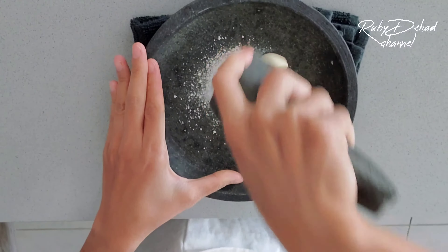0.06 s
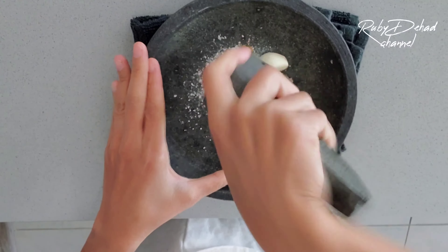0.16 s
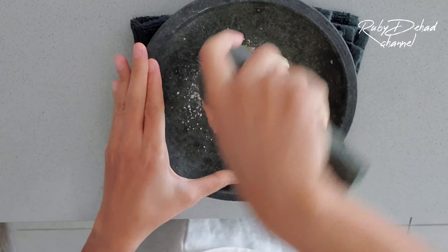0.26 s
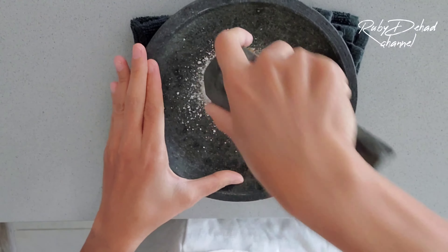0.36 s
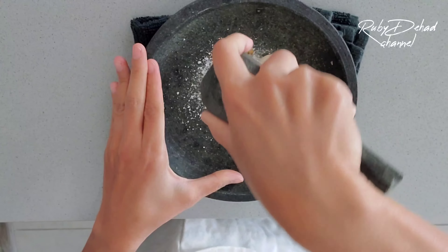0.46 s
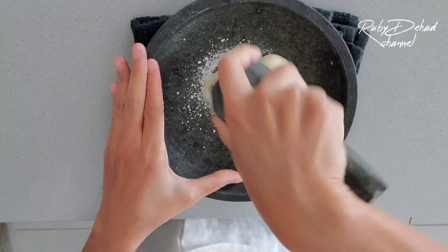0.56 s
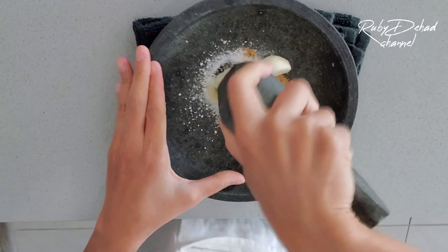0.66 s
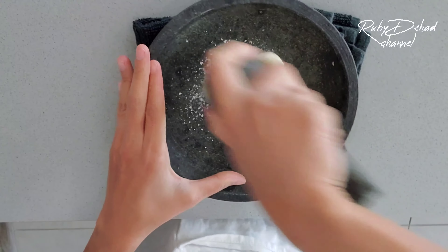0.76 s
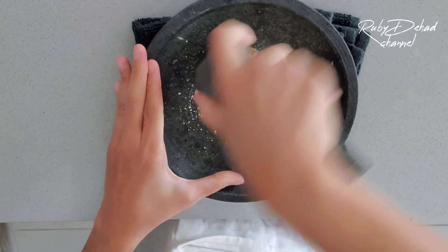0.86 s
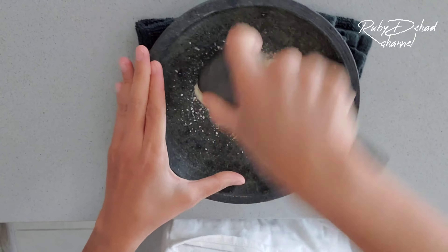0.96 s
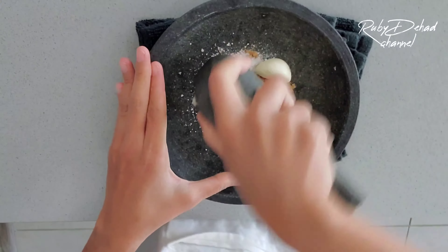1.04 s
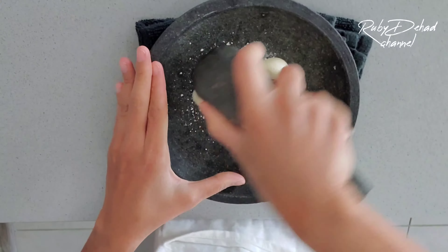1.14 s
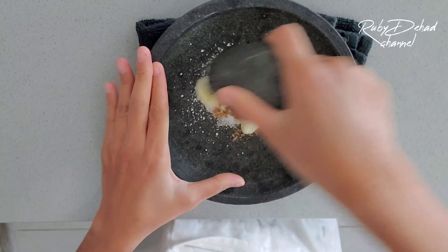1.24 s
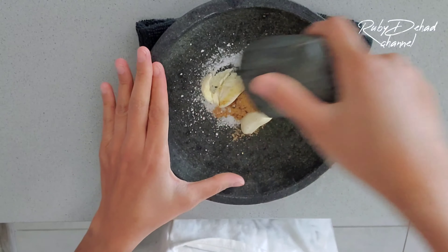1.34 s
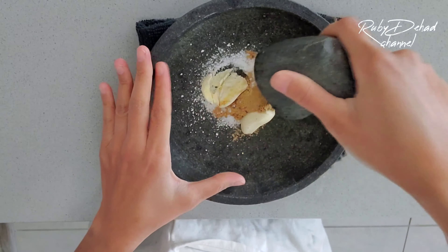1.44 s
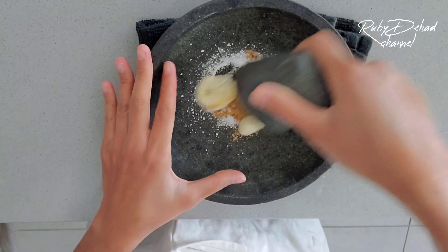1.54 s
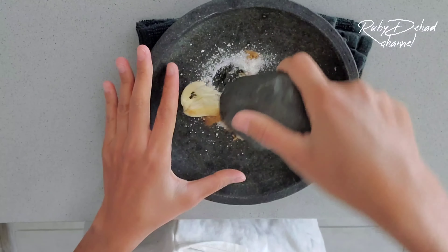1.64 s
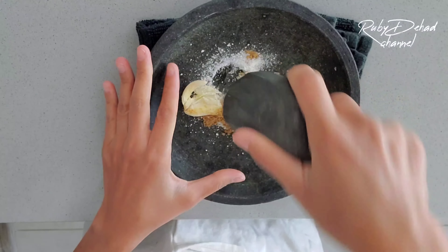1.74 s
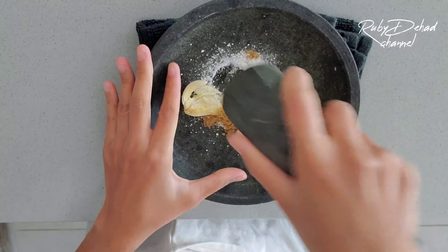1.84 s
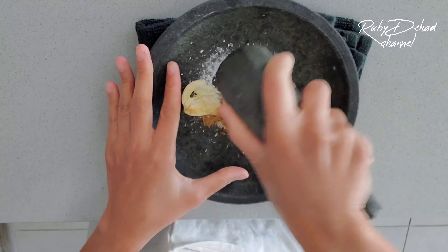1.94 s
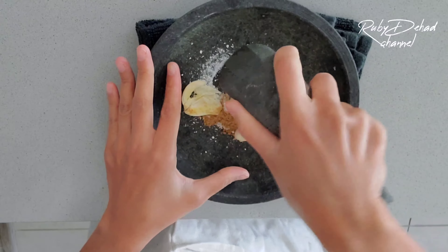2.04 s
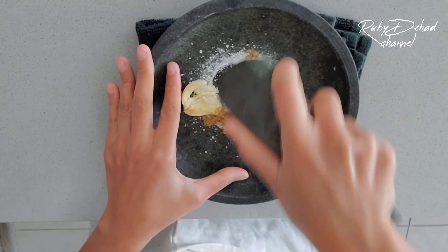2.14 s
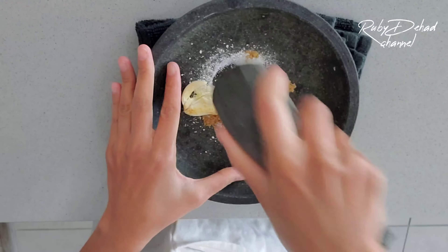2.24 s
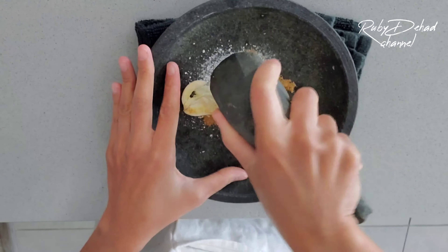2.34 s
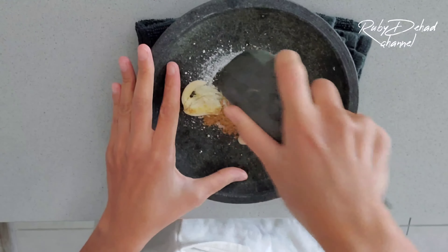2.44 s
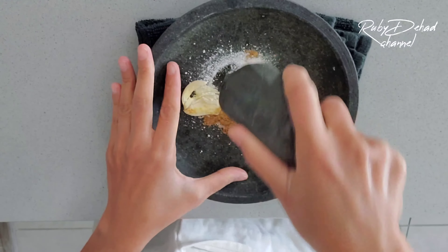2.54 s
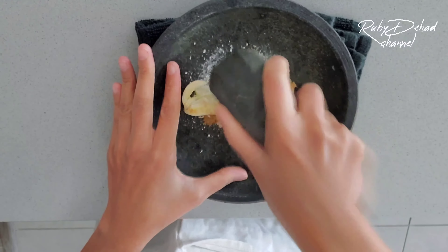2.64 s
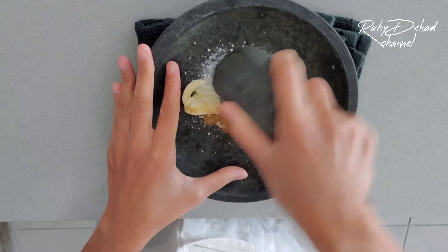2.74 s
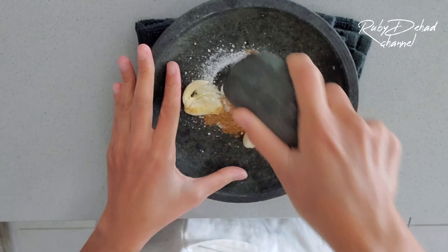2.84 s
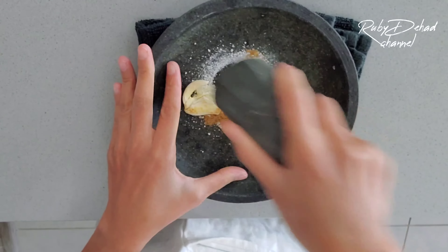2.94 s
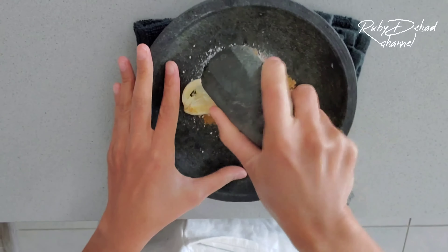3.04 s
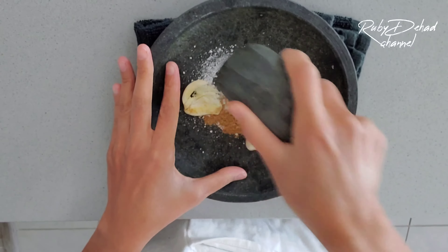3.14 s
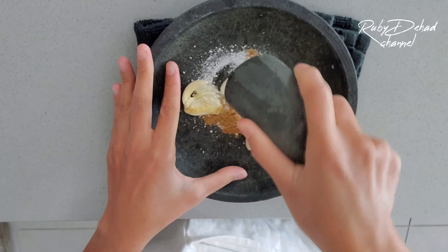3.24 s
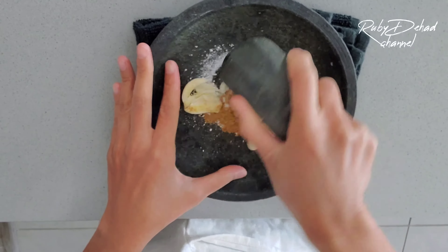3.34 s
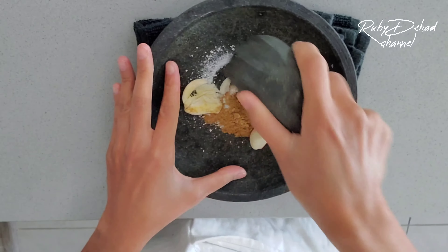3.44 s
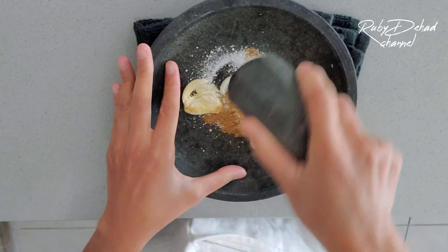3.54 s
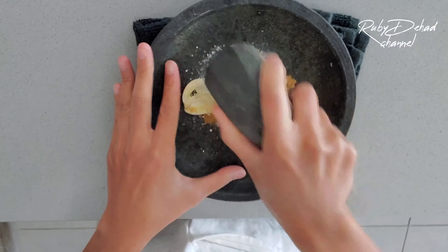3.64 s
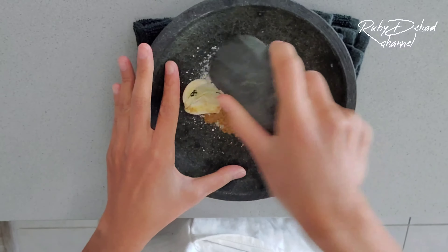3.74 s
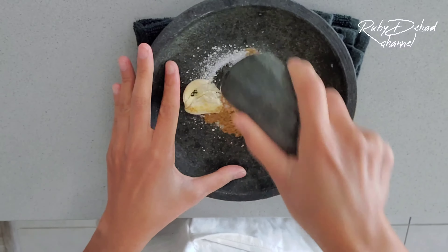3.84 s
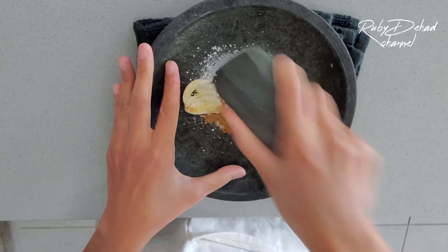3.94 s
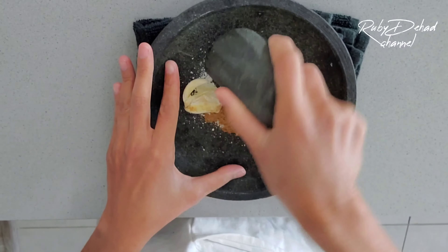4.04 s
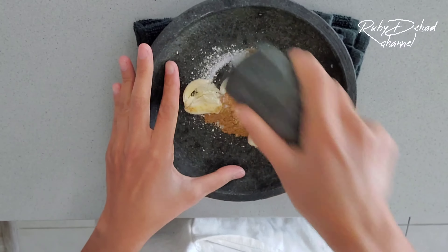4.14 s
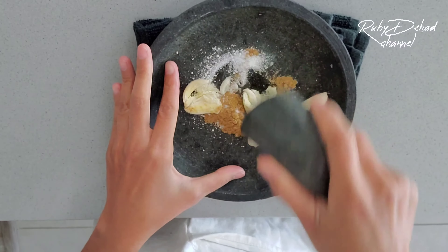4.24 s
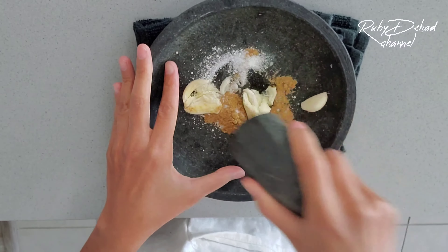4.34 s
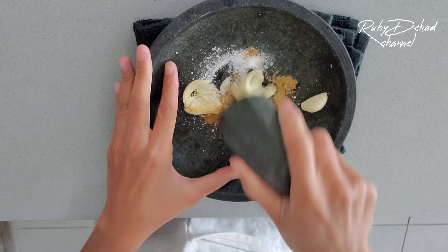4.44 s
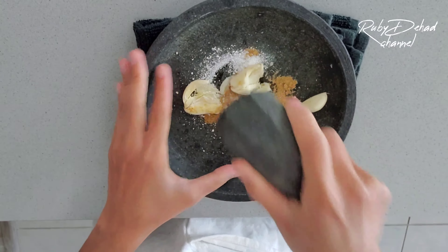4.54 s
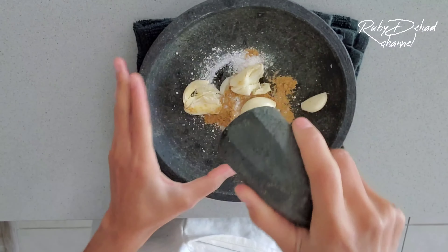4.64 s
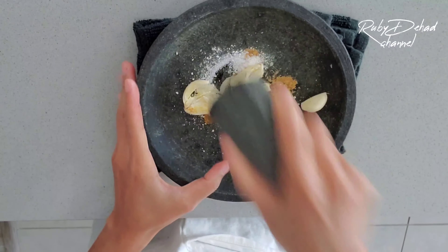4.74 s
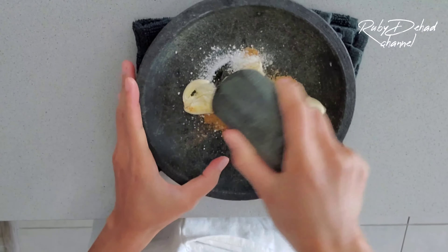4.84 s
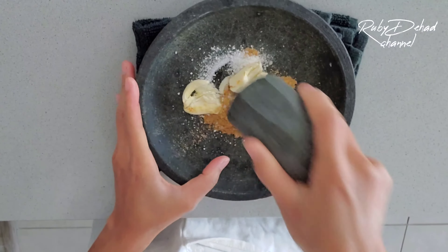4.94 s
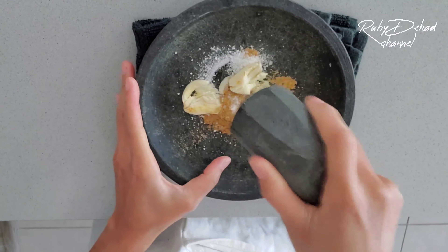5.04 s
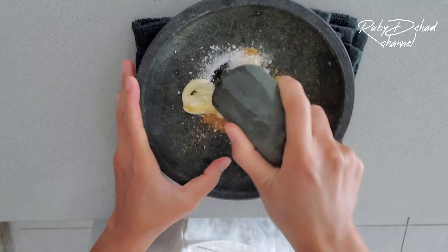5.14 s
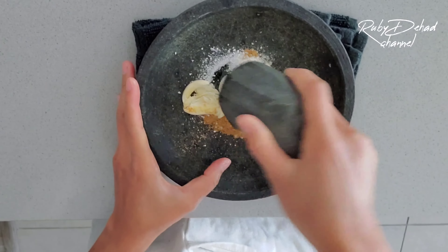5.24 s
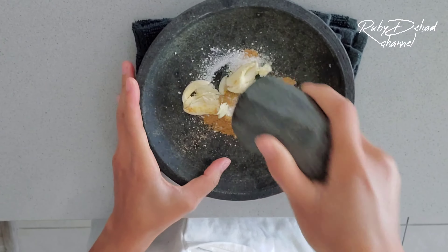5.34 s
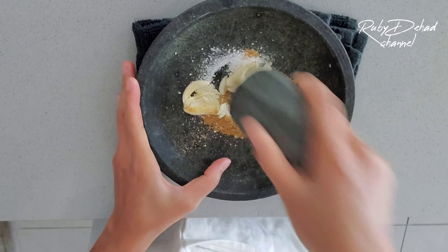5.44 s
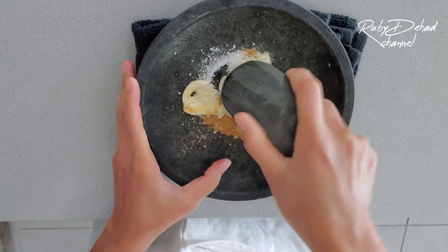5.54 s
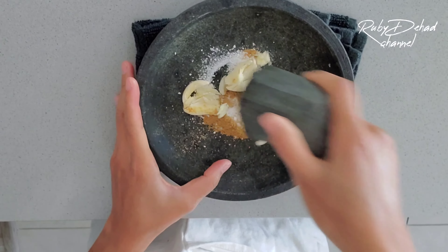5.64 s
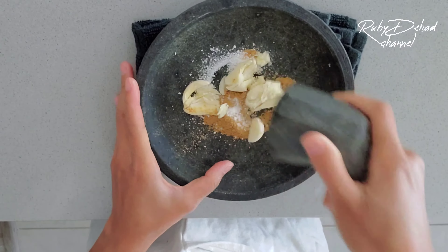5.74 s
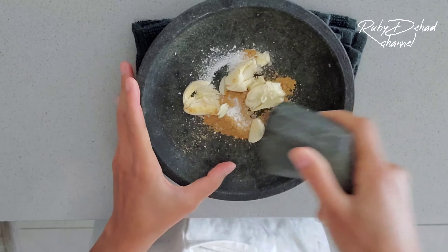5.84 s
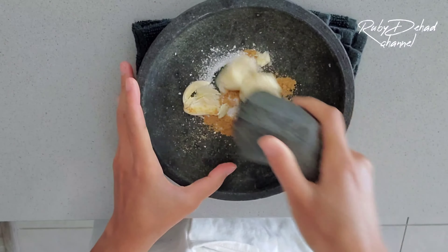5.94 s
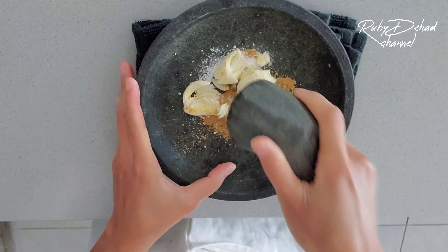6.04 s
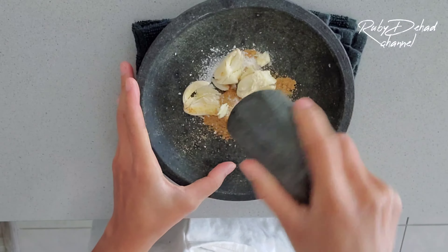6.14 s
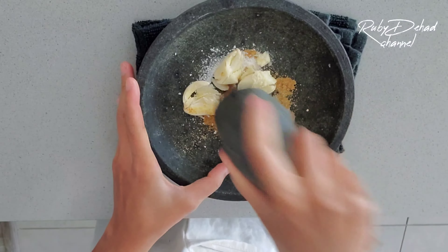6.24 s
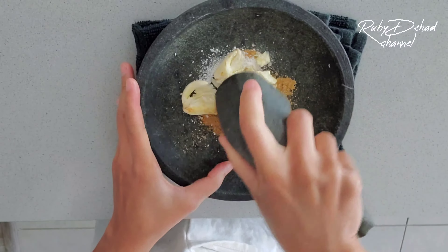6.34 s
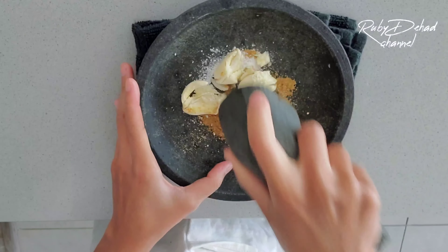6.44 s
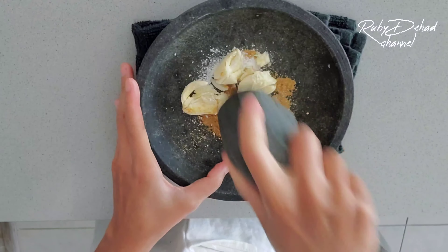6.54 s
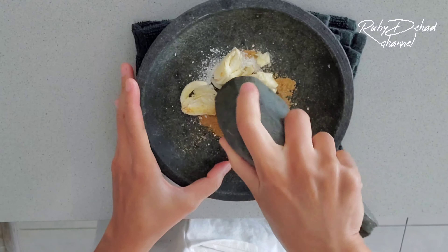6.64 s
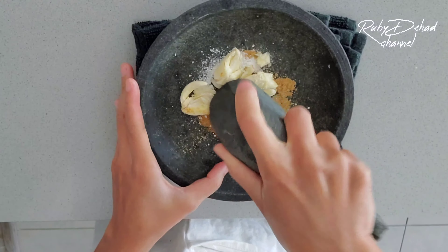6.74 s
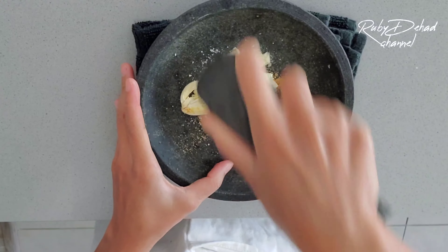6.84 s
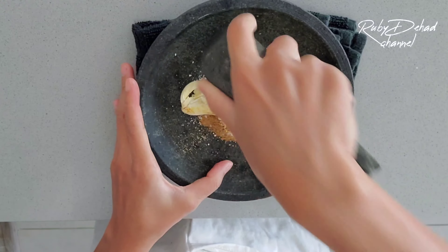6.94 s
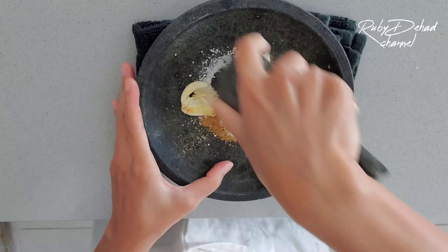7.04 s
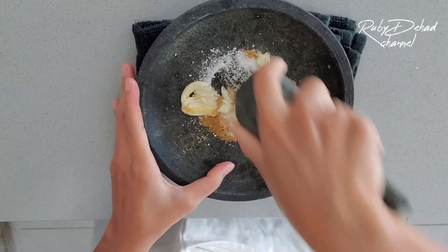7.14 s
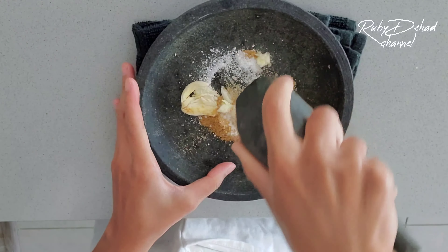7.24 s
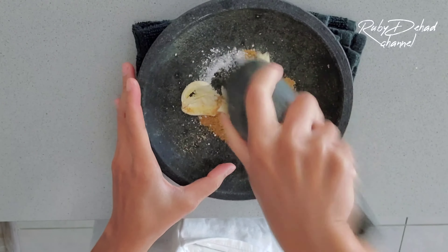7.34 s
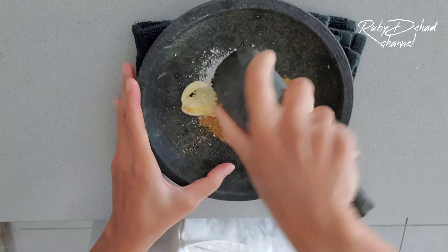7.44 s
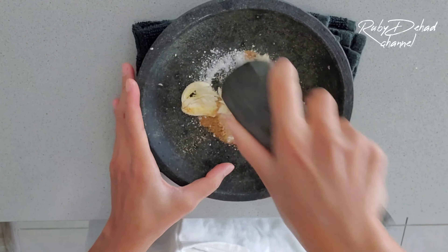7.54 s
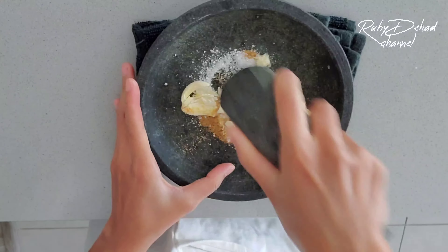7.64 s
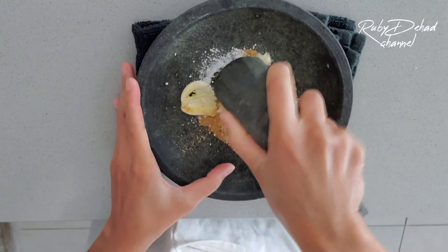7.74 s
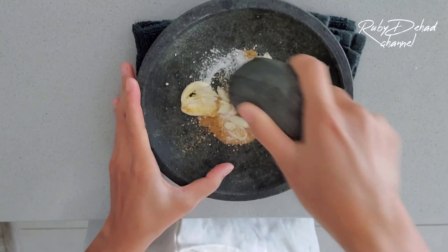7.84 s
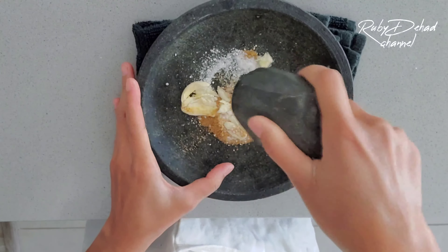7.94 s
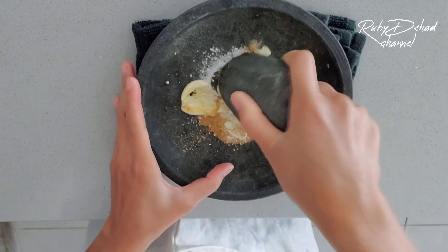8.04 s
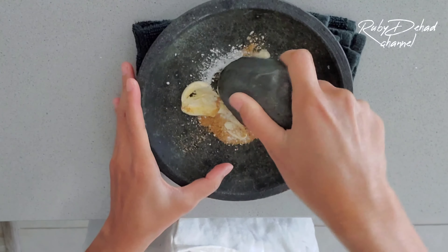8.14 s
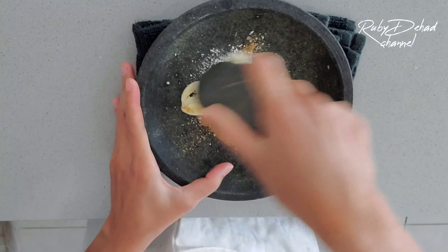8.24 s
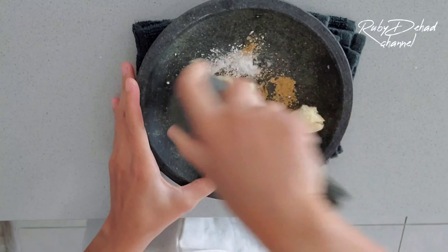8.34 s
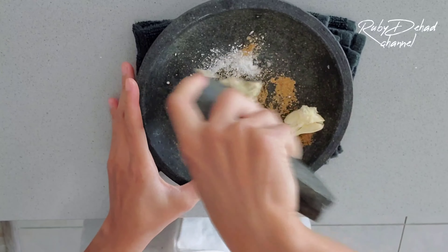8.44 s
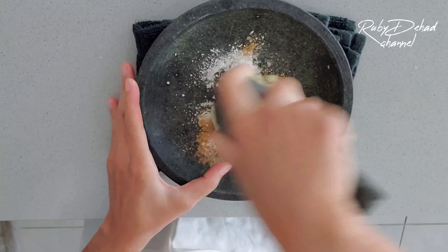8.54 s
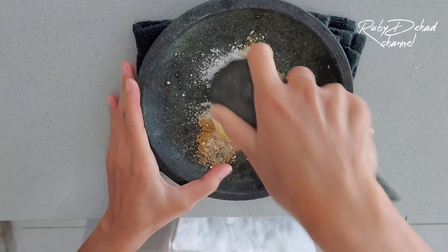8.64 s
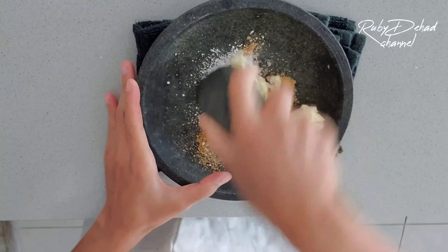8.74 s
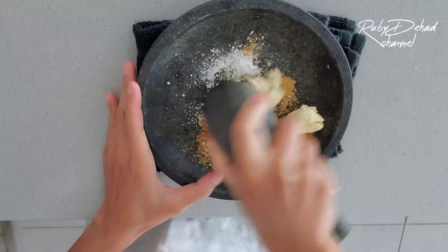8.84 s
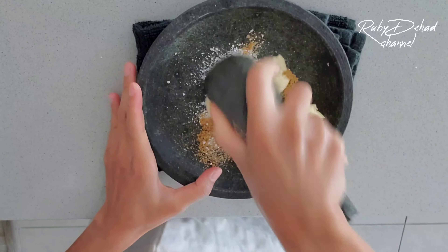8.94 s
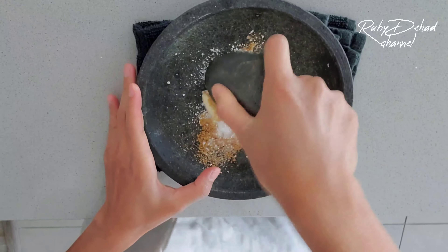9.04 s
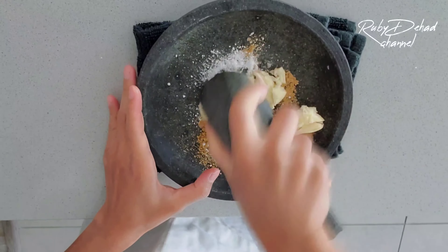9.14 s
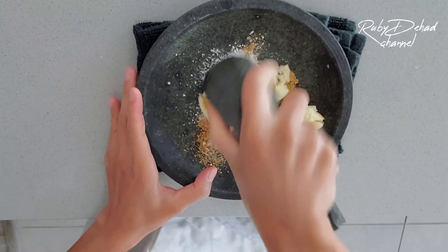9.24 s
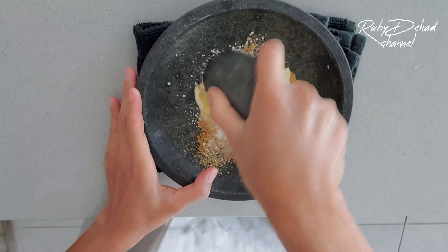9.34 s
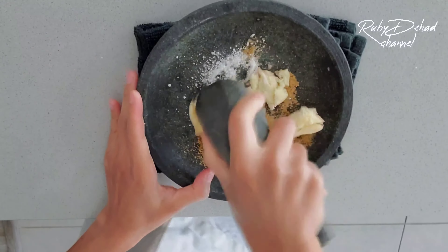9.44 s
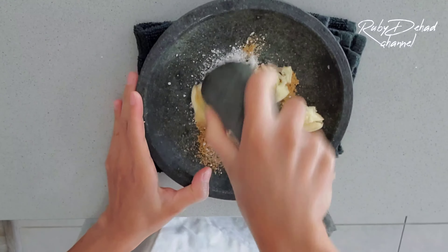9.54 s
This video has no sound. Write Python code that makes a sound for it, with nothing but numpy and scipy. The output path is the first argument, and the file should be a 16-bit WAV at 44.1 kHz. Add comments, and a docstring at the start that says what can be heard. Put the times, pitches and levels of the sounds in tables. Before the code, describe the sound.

A stone pestle pounds garlic, salt and spices in a stone mortar with crunchy clacks and low thuds, then grinds them, close up.

```python
"""At a counter in a small kitchen, a stone pestle pounds garlic, salt and spices in a wide stone mortar.
Each blow crushes grains, makes the stone ring and bounces the heavy mortar on the cloth beneath it.
Between blows and at the end the pestle is dragged through the salt, and single crystals snap.
It is all heard close up and in stereo, with a short room echo, soft hiss and a faint appliance hum."""
import sys
import numpy as np
from scipy import signal
from scipy.fft import rfft, irfft
from scipy.io import wavfile
from scipy.ndimage import uniform_filter1d, map_coordinates

SR = 44100
rng = np.random.default_rng(int(sys.argv[2]) if len(sys.argv) > 2 else 0)


def log_audio(samples):
    """Write samples as a 16-bit WAV file to the path given in sys.argv[1]."""
    # one column per channel
    frames = np.atleast_2d(samples).T
    # limit to full scale, then quantise
    limited = np.clip(frames, -1, 1)
    pcm = np.round(limited * 32767).astype(np.int16)
    wavfile.write(sys.argv[1], SR, pcm)


N = 422478
T = np.arange(N) / SR
EVENT_T = np.arange(-SR // 10, SR // 2) / SR  # seconds before and after one event

# Levels are starting points: the functions add their own gains. A fade time (t60) is a drop of 60 dB.
# Pestle blows: (time stone meets stone [s], crush time before it [s], bounce [dB], knock [dB],
# clack [dB], clack pitch [Hz], crunch [dB], pestle ring [dB])
BLOWS = [(0.1293, 0.0043, -22, -43.5, -36.5, 1420, -35.5, -36.5),
         (0.551, 0.0042, -31.5, -61, -55, 3320, -52, -49.5),
         (1.8856, 0.0056, -20.5, -45, -42, 1455, -45, -41),
         (2.2451, 0.0016, -15.5, -39, -26, 3540, -40, -29),
         (2.617, 0.0017, -15.5, -37.5, -31.5, 2910, -43.5, -31),
         (2.958, 0.0022, -16, -40.5, -20, 3340, -31.5, -34.5),
         (3.2803, 0.0029, -19, -42, -95, 1540, -36, -32.5),
         (3.603, .0018, -18, -43.5, -36, 1920, -37, -43.5),
         (3.9047, 0.0043, -20, -37.5, -65, 3635, -37.5, -37),
         (4.7138, 0.0082, -17.5, -44.5, -41, 1595, -39, -38),
         (5.0681, 0.0049, -16, -42, -31.5, 1540, -31.5, -35),
         (5.4223, 0.0087, -19, -41.5, -32.5, 1640, -34.5, -27.5),
         (6.2282, 0.0075, -25, -52.5, -42, 1605, -38.5, -28.5),
         (6.5347, 0.004, -25.5, -47, -35.5, 2230, -38.5, -33),
         (7.2965, .005, -25, -52.5, -35.5, 2250, -43.5, -33),
         (7.642, 0.0078, -18.5, -33, -44, 2915, -40, -50.5),
         (7.9947, 0.00047, -20, -18.5, -26.5, 1425, -41, -16.5)]
# The mortar springs back into the pestle: (time [s], level [dB])
REBOUNDS = [(0.141, -41.5), (3.2904, -28.5), (3.614, -28.5), (7.306, -33)]
# Drags of the pestle: (start [s], length [s], level [dB], swell from start to end [dB],
# moisture [0 dry salt, 0.5 ground spice, 1 garlic])
STROKES = [(0.139, 0.11, -45, 7.5, 0.51), (0.613, 0.12, -61, 5, 0.37), (0.703, 0.071, -37, 6, 0.5),
           (0.784, 0.14, -54.5, -4, 0.5), (0.979, 0.12, -47.5, 0.5, 0.66), (1.438, 0.13, -43.5, 2.5, 0.75),
           (2.728, 0.018, -50, 2.5, 0.65), (3.907, 0.034, -43, -12, 0.483),
           (4.304, 0.039, -45, 23.5, 0.029), (4.351, 0.052, -47, -3, 0.66), (5.879, 0.014, -37.5, 0, 0.048),
           (6.928, 0.11, -45, -12, 0.87), (7.299, 0.014, -30, -4, 1), (7.362, 0.031, -46.5, -4, 0.49),
           (8.335, 0.027, -57, -1, 0.37), (8.396, 0.067, -40.5, 3.5, 0.48), (8.694, 0.041, -53, -14, 0.51),
           (8.775, .143, -47.5, 14, 0.47), (8.931, 0.23, -47, 0.5, 0.51), (9.171, 0.12, -47, -10, 0.5),
           (9.351, 0.065, -39, -8, 0.49), (9.462, 0.094, -49, 16, 0.81)]
# Rubs on bare stone: (time [s], half length [s], mortar [dB], pestle [dB], overtone lift [dB/octave])
RUBS = [(0.235, 0.0089, -50, -44.5, 16), (0.764, 0.0059, -30.5, -33.5, 16.5),
        (0.851, 0.011, -46, -51.5, 16), (0.939, 0.0062, -44, -41.5, 19.5), (9.012, 0.016, -45, -47.5, -10),
        (9.038, 0.0046, -37, -34.5, 5.5), (9.308, 0.0086, -49.5, -40.5, 12.5),
        (9.407, 0.011, -54, -43.5, 10), (9.468, 0.014, -40.5, -37.5, 1)]
# Single salt crystals and garlic skins snap: (time [s], level [dB])
SNAPS = [(0.598, -48), (1.1537, -54.5), (1.44, -53), (3.948, -43), (6.9331, -39), (7.767, -59.5),
         (8.753, -41.5), (9.073, -45), (9.2403, -42), (9.253, -47), (9.35, -43.5), (9.46, -47.5),
         (9.5064, -39), (9.549, -49.5)]
# Where the pestle works in the bowl: (time [s], distance right of the middle [cm])
PESTLE_PATH = [(0.7, -2), (2.2, 4.5), (4.2, 2.5), (4.7, 12), (6.3, 8.5), (6.6, 1)]

# The tones that mortar and pestle ring with: (pitch [Hz], level [dB], fade time [s])
MORTAR_TONES = [(222, 6.5, 0.011), (303, -6, 0.071), (389, 6.5, 0.015), (519, -2.5, 0.06),
                (743, -4.5, 0.02), (920, -5, 0.023), (1216, -4.5, 0.015), (1350, -4, 0.015),
                (1736, 1, 0.039), (1986, -1, 0.013), (3330, 4.5, 0.019), (3840, -3.5, 0.015)]
PESTLE_TONES = [(2928.5, -2, 0.055), (2958, -1, 0.012), (2915, -41, 1), (5260, -16, 0.066),
                (5600, -22.5, 0.026), (7800, -28, 0.04)]
# The mortar rocking on cloth and counter: (pitch [Hz], level [dB], fade time [s], build-up [s])
BOUNCE_TONES = [(72.45, 5.5, 0.22, 0.014), (42.67, -10, 0.68, 0.075), (92.4, -19, 0.13, 0.0068)]
# The appliance's hum: (pitch [Hz], level [dB])
HUM_TONES = [(59.6, -68.5), (119.4, -68.5)]

# A colour says how strong a sound is from bass to treble: (frequency [Hz], level [dB])
CLACK_COLOUR = [(500, -13), (1200, 5), (8000, 1.5), (9700, -3), (12500, 4.5)]  # stone hitting stone
CRUNCH_COLOUR = [(300, -13.5), (900, -23.5), (2000, -6), (3450, -1), (8100, -2.5), (9500, -18.5),
                 (12000, -19.5), (16000, -39)]  # spices under a blow
FIZZ_COLOUR = [(3000, -58), (8000, -4.5), (10000, -14), (12500, 11), (15500, 5.5)]  # bursting crystals
SHUDDER_COLOUR = [(35, -32), (95, 14), (150, -3), (450, -18.5), (2000, -53.5)]  # the shaking counter
SALT_COLOUR = [(300, -6.5), (4500, -4.5), (7600, 12.5), (9500, -5), (12500, 3.5), (15800, -12.5)]  # dry salt dragged over stone
GRIT_COLOUR = [(200, -20.5), (800, -29), (1400, -7), (2200, -2.5), (3400, 3), (5400, 3), (8000, -3),
               (9400, -26.5), (12500, -9.5), (15800, -19.5)]  # cracking grains
RUB_COLOUR = [(200, 5.5), (400, 12), (750, -2.5), (1200, 10.5), (2500, 0), (6000, -23)]  # stone rubbing stone
ECHO_COLOUR = [(50, -12), (200, 2), (1700, -2.5), (3200, -0.5), (8000, -1.5), (13000, -7.5)]  # the kitchen's echo
HISS_COLOUR = [(35, 19.5), (70, 24.5), (140, 14.5), (200, 4.5), (430, -7), (535, 15.5), (660, -0.5),
               (1500, -12.5), (8000, -3.5), (9500, -22), (15500, -8.5)]  # the quiet room

# How long the kitchen echoes: (frequency [Hz], fade time [s])
ROOM_FADE = [(3500, 0.53), (13000, 0.67)]
# How far the left side leads for a sound in mid-bowl: (frequency [Hz], phase lead [radians])
LEFT_LEAD = [(3000, 0.13), (4300, 1), (6200, 1), (15000, 0.69)]


def blows(knock_gain_db=-1, clack_gain_db=-1, crunch_gain_db=2, wall_db=-6, push_share=0.2):
    """Each blow crunches the spices, whose cracks ring the wall, then hits stone with a clack and knock."""
    out = np.zeros(N)
    knock = colour(tones(MORTAR_TONES), [(700, -7), (1300, 8), (2300, -6.5)])
    for time, crush_s, _, knock_db, clack_db, clack_hz, crunch_db, _ in BLOWS:
        cracks = crush(crush_s, stop_s=0.0012)
        push = np.exp(-np.abs(EVENT_T) / (push_share * crush_s))  # a padded blow is longer and duller
        fizz_db = -8.5 + 0.72 * crunch_db - 0.6 * time  # fades as the salt gets finer and damper
        add(out, time, burst(ring(push, knock), knock_db + knock_gain_db))
        add(out, time, burst(clack(clack_hz), clack_db + clack_gain_db))
        add(out, time, burst(colour(cracks, CRUNCH_COLOUR), crunch_db + crunch_gain_db))
        add(out, time, burst(ring(cracks, struck_wall()), crunch_db + wall_db))
        add(out, time, burst(colour(cracks, FIZZ_COLOUR), fizz_db))
    return out


def crush(build_s, stop_s, crumbs_db=-13, crumbs_s=0.017):
    """Cracks build as the pestle sinks in and stop when stone meets stone; a few crumbs crackle on."""
    build = np.exp(-(np.minimum(EVENT_T, 0) / build_s) ** 2)
    after = np.maximum(EVENT_T, 0)
    cracks = grains(len(EVENT_T), per_s=12000, spread_db=4) * np.exp(-after / stop_s)
    crumbs = grains(len(EVENT_T), per_s=1500, spread_db=4) * np.exp(-after / crumbs_s)
    return soften_pitch(build * (cracks + undb(crumbs_db) * crumbs))


def clack(hz, skid_db=-7, skid_s=0.001):
    """Stone hits stone and skids for a moment, giving a very short note."""
    t = np.maximum(EVENT_T, 0)
    skid = rng.standard_normal(len(t)) * (EVENT_T > 0) * np.exp(-t / skid_s)
    force = (EVENT_T == 0) + undb(skid_db) * skid / np.linalg.norm(skid)
    return colour(resonance(force, np.full(len(t), hz), sharpness=3), CLACK_COLOUR)


def struck_wall(spot_db=4):
    """The mortar's higher tones; each spot in the bowl favours different ones."""
    return tones([(hz, db + spot_db * rng.standard_normal(), t60)
                  for hz, db, t60 in MORTAR_TONES if hz > 1000])


def pestle_rings(gain_db=-1, travel_s=0.00073, padding_per_s=1200, bedded_s=0.003):
    """Each blow rings the pestle; bedded in garlic, it rings shorter and sends less into the room."""
    close, into_room = np.zeros(N), np.zeros(N)
    onset = np.tanh(EVENT_T[EVENT_T >= 0] / travel_s)  # the wave must first run along the pestle
    tap = 1. * (EVENT_T == 0)
    for time, crush_s, *_, ring_db in BLOWS:
        pestle = onset * held_pestle(padding=padding_per_s * crush_s)
        tone = burst(ring(tap, pestle), ring_db + gain_db)
        add(close, time, tone)
        add(into_room, time, tone / (1 + (crush_s / bedded_s) ** 2))
    return close, into_room


def held_pestle(overtone_db=0, padding=0, grip_spread=0.0026):
    """The pestle's ring: the hand never holds it quite the same, and garlic under it cuts it short."""
    detune = 1 + grip_spread * rng.standard_normal()
    stretch = rng.uniform(.85, 1.15)
    main_hz = PESTLE_TONES[0][0]
    return tones([(hz * detune, db + overtone_db * np.log2(hz / main_hz), stretch / (1 / t60 + padding))
                  for hz, db, t60 in PESTLE_TONES])


def rebounds(hz=3500):
    """The mortar springs back and clacks against the pestle a second time."""
    out = np.zeros(N)
    for time, db in REBOUNDS:
        add(out, time, burst(clack(hz), db))
    return out


def bounces(gain_db=-2, shudder_db=-17, shudder_t60=0.52, settle_db=-29, settle_s=0.026,
            lean_db=-11, lean_limit_db=-41):
    """After each blow the mortar rocks on its cloth and settles with small knocks; the counter shakes."""
    out, t = np.zeros(N), np.maximum(EVENT_T, 0)
    rock = sum(undb(db) * (1 - np.exp(-(t / rise) ** 2)) * fade(t, t60) * np.sin(2 * np.pi * hz * t)
               for hz, db, t60, rise in BOUNCE_TONES)
    small_knock = ring(np.exp(-(EVENT_T / .001) ** 2), tones(MORTAR_TONES[:3]))
    for time, _, db, *_ in BLOWS:
        shake = rng.standard_normal(len(t)) * (EVENT_T > 0) * fade(t, shudder_t60)
        shudder = colour(shake, SHUDDER_COLOUR)
        add(out, time, burst(rock, db + gain_db) + burst(shudder, db + shudder_db))
        delays = np.cumsum(settle_s * (.5 + rng.random(size=3)))
        for count, delay in enumerate(delays, start=1):
            add(out, min(time + delay, T[-1]), burst(small_knock, db + settle_db) / count)
    # Dragging the pestle also rocks the mortar a little.
    push = rng.standard_normal(N) * np.minimum(pressure(), undb(lean_limit_db))
    lean = ring(push, rock / np.linalg.norm(rock))
    return out + undb(lean_db) * np.roll(lean, -np.sum(EVENT_T < 0))


def grinding(gain_db=-4, ring_db=-13, coarse_db=-9, rasp_hz=3600, gap_s=0.00076):
    """Grains crack in clumps as the pestle catches and slips: bright salt, gritty spice, raspy garlic."""
    catch = undb(3.6 * np.tanh(wander(170)) + 2.2 * np.tanh(wander(45)))
    fine = grains(N, per_s=2200, spread_db=1.5)
    coarse = grains(N, per_s=90, spread_db=3)
    cracks = (fine + undb(coarse_db) * coarse) * catch
    echo_s = gap_s * 2 ** (.35 * wander(12))  # the changing gap under the pestle shifts the colour
    cracks = cracks + .5 * map_coordinates(cracks, [(T - echo_s) * SR], order=1, mode="mirror")
    grit = colour(cracks, GRIT_COLOUR)
    sliding_hz = rasp_hz * 2 ** (.2 * np.tanh(wander(20)))
    rasp = resonance(np.gradient(grit), sliding_hz, sharpness=2.8)
    salt, spice, garlic = (x / band_level(x, 3300, 8500)
                           for x in (colour(cracks, SALT_COLOUR), grit, rasp))
    pestle = ring(cracks, tones(PESTLE_TONES))
    spice = spice + undb(ring_db) * pestle / np.std(pestle)
    return undb(gain_db) * (salt * pressure(0) + spice * pressure(.5) + garlic * pressure(1))


def pressure(moisture=None, bite_s=0.0051, lift_s=0.0066, arch_db=4):
    """Each stroke bites, swells or eases, and lifts off. A moisture picks out salt, spice or garlic."""
    power = np.zeros(N)
    for start, length, db, swell_db, moist in STROKES:
        share = 1 if moisture is None else max(1 - 2 * abs(np.clip(moist, 0, 1) - moisture), 0)
        along = np.clip(EVENT_T / length, 0, 1)
        edges = np.exp(np.minimum(EVENT_T, 0) / bite_s - np.maximum(EVENT_T - length, 0) / lift_s)
        level_db = db + swell_db * (along - .5) + arch_db * (np.sin(np.pi * along) - 2 / np.pi)
        add(power, start, share * (edges * undb(level_db)) ** 2)
    return np.sqrt(power)


def rubs(bite=0.68):
    """Stone catches on stone and skips over its pits: a quick rattle that rings mortar and pestle."""
    out, mortar = np.zeros(N), colour(tones(MORTAR_TONES), RUB_COLOUR)
    for time, half_s, mortar_db, pestle_db, overtone_db in RUBS:
        width = half_s * np.where(EVENT_T < 0, bite, 2 - bite)  # it catches faster than it lets go
        swell = np.exp(-(EVENT_T / width) ** 2 / 2)
        rattle = soften_pitch(grains(len(EVENT_T), per_s=1200, spread_db=4) * swell)
        mortar_ring = burst(ring(rattle, mortar), mortar_db)
        pestle_ring = burst(ring(rattle, held_pestle(overtone_db)), pestle_db)
        length_gain = np.sqrt(2 * half_s * 100)  # a longer rub carries more energy
        add(out, time, length_gain * (mortar_ring + pestle_ring))
    return out


def snaps(grit_db=1, fizz_db=-7, length_s=0.00077):
    """A crystal or a garlic skin gives way in a short cluster of cracks."""
    out = np.zeros(N)
    for time, db in SNAPS:
        cracks = crush(length_s, length_s)
        add(out, time, burst(colour(cracks, GRIT_COLOUR), db + grit_db))
        add(out, time, burst(colour(cracks, FIZZ_COLOUR), db + fizz_db))
    return out


def left_and_right(x, lag_s_per_cm=6e-6):
    """The left side is brighter and slightly early; as the pestle moves, the nearer side gains a lead."""
    hz = np.arange(N // 2 + 1) / N * SR
    tilt_db = read_curve([(6000, 0.27), (14000, 12)], hz)
    shift = undb(tilt_db / 2) * np.exp(.5j * read_curve(LEFT_LEAD, hz))
    left, right = irfft(rfft(x) * shift, N), irfft(rfft(x) / shift, N)
    lag_s = lag_s_per_cm * np.interp(T, *np.transpose(PESTLE_PATH))
    return np.array([map_coordinates(side, [(T + sign * lag_s / 2) * SR], order=3, mode="mirror")
                     for side, sign in ((left, -1), (right, 1))])


def bowl_echo(x, gain_db=-6, t60=0.0099, above_hz=4000):
    """The bowl's walls scatter the treble within a few milliseconds, differently to each side."""
    t = EVENT_T[EVENT_T >= 0]
    treble = signal.sosfilt(signal.butter(1, above_hz, "high", fs=SR, output="sos"), x)
    scatter = rng.standard_normal((2, len(t))) * fade(t, t60) * np.minimum(t / t60, 1)
    return undb(gain_db) * np.array([ring(treble, side / np.linalg.norm(side)) for side in scatter])


def kitchen_echo(x, tail_db=-12.5, early_db=-13, build_s=0.0077):
    """Counter and cupboards answer at once, then the room dies away; each side gets its own echoes."""
    t, sides = np.arange(int(SR * .7)) / SR, []
    hz = np.arange(len(t) // 2 + 1) * SR / len(t)
    edges = np.append(0, np.geomspace(150, SR / 2, num=10))
    for _ in range(2):
        noise = rfft(rng.standard_normal(len(t)))
        tail = np.zeros(len(t))
        for lo, hi in zip(edges, edges[1:]):
            band = irfft(noise * (hz >= lo) * (hz < hi), len(t))
            tail += band * fade(t, read_curve(ROOM_FADE, (lo + hi) / 2))
        tail *= np.clip(t / build_s, 0, 1)
        early = rng.standard_normal(len(t)) * fade(t, t60=0.13) * (t > .002)
        early = colour(early / np.linalg.norm(early), [(600, 1), (1400, 8), (2800, 2)])
        echo = undb(tail_db) * tail / np.linalg.norm(tail) + undb(early_db) * early
        sides.append(ring(x, colour(echo, ECHO_COLOUR)))
    return np.array(sides)


def hiss_and_hum(hiss_db=-81.5, side_db=-7):
    """Soft room hiss and the wavering hum of an appliance."""
    mid, side = (colour(rng.standard_normal(N), HISS_COLOUR) for _ in range(2))
    hiss_gain = undb(hiss_db) / band_level(mid, 800, 16000)
    side = colour(side, [(100, -2.5), (1000, 7), (8000, -6.5)]) * undb(side_db)
    hum, times = np.zeros(N), np.linspace(0, T[-1], num=60)
    for hz, db in HUM_TONES:
        waver_db = np.interp(T, times, rng.standard_normal(len(times)))
        hum += np.sqrt(2) * undb(db + waver_db) * np.sin(2 * np.pi * hz * T)
    return hiss_gain * np.array([mid + side, mid - side]) + hum


def grains(count, per_s, spread_db):
    """Tiny cracks at random times and of very unequal size."""
    hit = rng.random(count) < per_s / SR
    x = hit * rng.choice([-1, 1], count) * undb(spread_db * np.minimum(rng.standard_normal(count), 2.5))
    return x / np.std(x)


def soften_pitch(x, evenness=0.4):
    """Partly even out the frequencies in a cluster of clicks, so it has little pitch of its own."""
    spectrum = rfft(x)
    power = uniform_filter1d(np.abs(spectrum) ** 2, size=50) + 1e-12
    return irfft(spectrum / power ** (evenness / 2), len(x))


def tones(table):
    """The fading tones of an object after one sharp tap."""
    t = EVENT_T[EVENT_T >= 0]
    return sum(undb(db) * fade(t, t60) * np.cos(2 * np.pi * hz * t) for hz, db, t60 in table)


def ring(x, response):
    """Let x shake an object or room, given its response to one tap."""
    return signal.fftconvolve(x, response)[:len(x)]


def resonance(x, hz, sharpness):
    """Bring out the sound near one pitch, which may slide."""
    turn = np.exp(2j * np.pi * np.cumsum(hz) / SR)
    feedback = np.exp(-np.pi * hz.mean() / sharpness / SR)
    return (signal.lfilter([1], [1, -feedback], x / turn) * turn).real


def colour(x, points, size=4096):
    """Shape bass and treble along (frequency [Hz], level [dB]) points."""
    hz = np.arange(size // 2 + 1) * SR / size
    cepstrum = irfft(np.log(undb(read_curve(points, hz))))
    # Fold the filter forward in time, so nothing sounds before its cause.
    cepstrum[1:size // 2] *= 2
    cepstrum[size // 2 + 1:] = 0
    return ring(x, irfft(np.exp(rfft(cepstrum))))


def read_curve(points, hz):
    """Read between (frequency [Hz], value) points, with octaves evenly spaced."""
    point_hz, value = np.transpose(points)
    return np.interp(np.log(hz + 1), np.log(point_hz), value)


def wander(per_s):
    """A smooth random drift, typically about 1 in size."""
    size = int(SR / per_s)
    x = uniform_filter1d(rng.standard_normal(N), size, mode="wrap")
    x = uniform_filter1d(x, size, mode="wrap")
    return x / np.std(x)


def fade(t, t60):
    """Die away by 60 dB every t60 seconds."""
    return np.exp(-np.log(1000) * t / t60)


def undb(db):
    """Turn decibels into a gain."""
    return 10 ** (np.asarray(db) / 20)


def band_level(x, lo_hz, hi_hz):
    """Average strength (rms) of x between two frequencies."""
    hz = np.arange(len(x) // 2 + 1) * SR / len(x)
    return np.sqrt(2 * np.sum(np.abs(rfft(x)[(hz > lo_hz) & (hz < hi_hz)]) ** 2)) / len(x)


def burst(x, db):
    """Give a short sound the energy of 10 ms at this level."""
    return x * undb(db) / np.sqrt(np.sum(x ** 2) / (SR / 100))


def add(track, time, sound):
    """Mix in a sound laid out on EVENT_T, with its zero at this time."""
    start = int(round((time + EVENT_T[0]) * SR))
    lo, hi = max(start, 0), min(start + len(sound), N)
    track[lo:hi] += sound[lo - start:hi - start]


def scene(bounce_echo_db=-7):
    """Stone and spices sound in bowl and kitchen, over the low bounce, the hiss and the hum."""
    pounding = blows() + rebounds() + snaps() + rubs() + grinding()
    bounce = bounces()
    ring_close, ring_into_room = pestle_rings()
    close = pounding + ring_close
    room = kitchen_echo(pounding + ring_into_room + undb(bounce_echo_db) * bounce)
    return left_and_right(close + bounce) + bowl_echo(close) + room + hiss_and_hum()


def record(dry):
    """Cut the highest treble, above 16100 Hz."""
    return signal.sosfilt(signal.ellip(8, .2, 70, 16100, fs=SR, output="sos"), dry)


dry = scene()
out = record(dry)
log_audio(out)
```